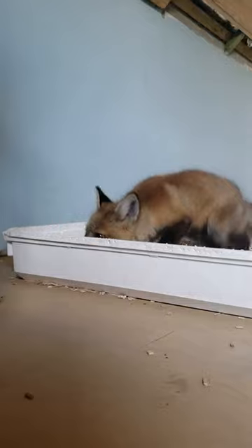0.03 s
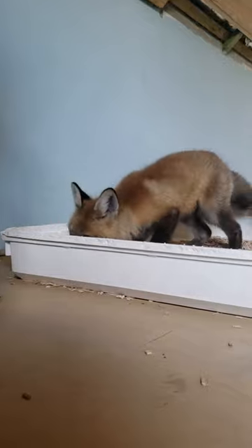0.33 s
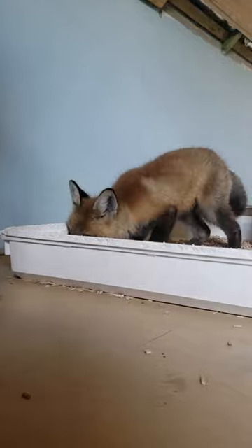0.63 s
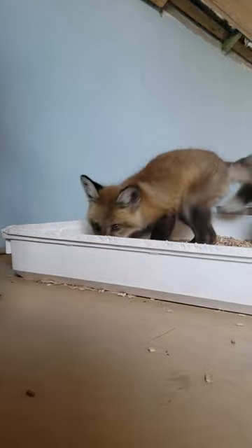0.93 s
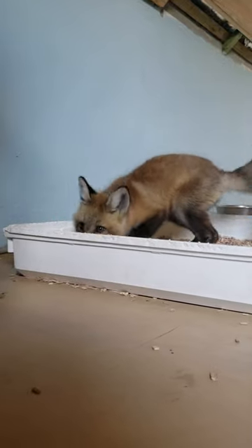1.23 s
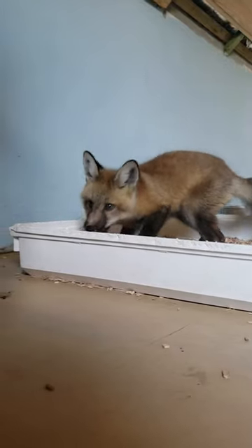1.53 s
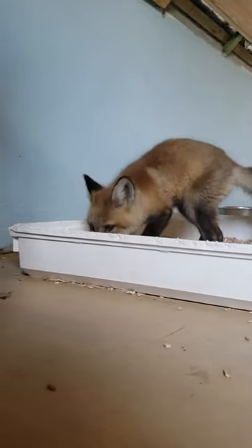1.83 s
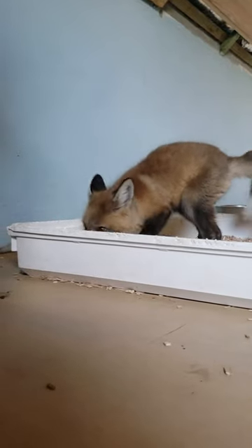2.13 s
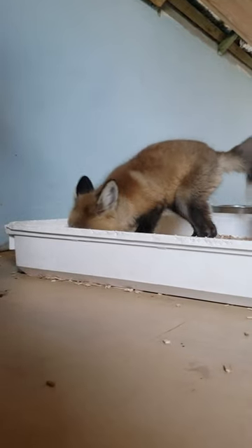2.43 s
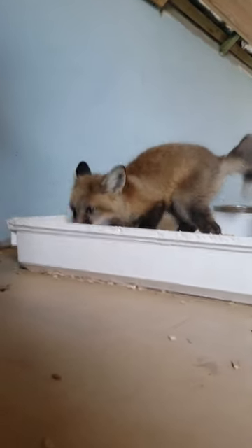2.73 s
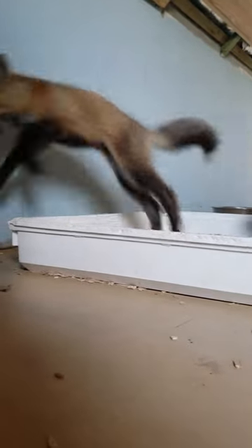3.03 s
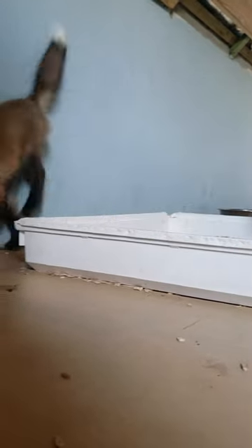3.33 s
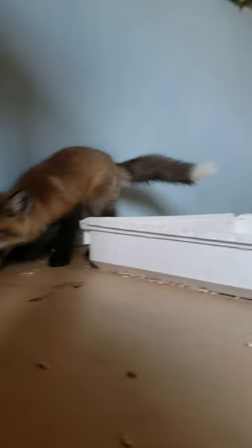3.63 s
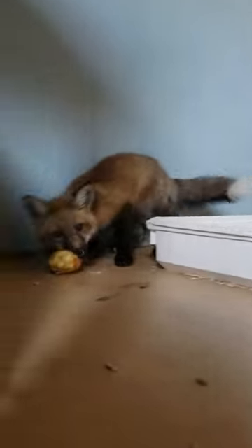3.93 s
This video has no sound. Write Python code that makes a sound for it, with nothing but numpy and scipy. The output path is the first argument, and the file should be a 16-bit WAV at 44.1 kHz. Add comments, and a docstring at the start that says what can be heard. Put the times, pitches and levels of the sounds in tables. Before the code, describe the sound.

Litter crunches and rustles as a fox cub digs in a plastic tray in a small room, with stronger strokes, knocks and clicks around 1, 1.9 and 2.5 seconds. Faint birds twitter outside until about 1.6 seconds. At 2.8 seconds something brushes the microphone on the right. The cub jumps out, scattering litter and thumping onto the floor from 3.2 to 3.5 seconds. An airy swish swells near the end.

```python
"""Over low room tone, small birds twitter outside as a fox cub starts rooting through the litter of a
plastic tray in a small bare room. Each stroke is a cloud of grains that crunch, hiss and rattle the tray;
paws knock and drag, claws and pellets click. Near 2.8 s something brushes the right microphone. Then the
cub leaps out in a spray of fine litter and thumps onto the floor, which rings low. A long, airy swish
swells beside the right microphone at the end."""
import sys
import numpy as np
from scipy import signal
from scipy.fft import rfft, irfft
from scipy.io import wavfile
from scipy.ndimage import uniform_filter1d

SR = 44100
rng = np.random.default_rng(int(sys.argv[2]) if len(sys.argv) > 2 else 0)


def persist_wave(psi):
    """Save psi, clipped to +-1, as 16-bit WAV."""
    counts = np.round(np.clip(psi, -1, 1) * 32767).astype(np.int16)
    wavfile.write(sys.argv[1], SR, np.atleast_2d(counts).T)


N = 176400

# EQ curves of the room tone: rumble and hiss (frequency [Hz], gain [dB])
AIR_RUMBLE_EQ = [(25, -23), (40, -7), (55, 5), (70, -1.5), (90, -14), (130, -8.5), (200, -23.5),
                 (500, -26.5), (1500, -51), (6000, -53)]
AIR_HISS_EQ = [(200, 1), (500, -5.5), (1200, -11), (3000, -8), (5000, -10.5), (8200, -12.5), (13000, -6),
               (16000, -9)]
# bird twitters (time [s], length [s], pitch [Hz], sweep [share of pitch], level [dB])
TWITTERS = [(0.25, 0.054, 2820, 0.0422, -72), (0.38, 0.094, 3780, 0.031, -66.5),
            (0.408, 0.059, 3350, 0.096, -62.5), (0.638, 0.12, 6800, 0.083, -71.5),
            (0.654, .06, 3900, 0.062, -70.5), (0.76, 0.073, 2810, .035, -59.5), (.8, 0.05, 2550, 0.11, -60),
            (1.351, 0.061, 2750, 0.0545, -51.5), (1.448, 0.08, 3500, 0.1264, -54.5),
            (1.44, .2, 2790, .06, -59), (0.471, 0.0406, 3266, 0.1045, -71.5)]
# close brushes (peak time [s], rise [s], fall [s], rumble [dB], scratch [dB], hiss [dB])
BRUSHES = [(2.788, 0.0117, 0.0148, -43, -49, -64), (2.838, 0.0015, .006, -35.5, -39, -31),
           (2.861, .024, .011, -30, -22, -33)]
# EQ curves of the close rubbing (frequency [Hz], gain [dB])
RUMBLE_EQ = [(25, -20), (60, -5), (110, 7), (250, -6.5), (600, -28.5)]
SCRATCH_EQ = [(100, -3), (350, 3.5), (900, 2), (1500, 1.5), (2100, 4), (4000, -9.5), (7000, -13.5),
              (10000, -6.5), (16000, -23)]
SWISH_EQ = [(60, -1.5), (200, -5), (400, -14.5), (750, -8.5), (1300, -21), (2200, -19.5), (3200, -13),
            (5000, -13.5), (7200, -4), (8200, -14), (10000, -1.5), (13500, 3.5), (16000, -1)]
# resonances of the floor and the plastic tray (frequency [Hz], level [dB], time to fall 60 dB [s])
FLOOR_MODES = [(56, -11, 0.24), (80, -3.5, 0.203), (108, -3, 0.2), (120.4, -4, 0.164), (182.8, -4.5, 0.19),
               (283.1, -4, 0.123), (294.9, -2, .22), (343, -7.5, 0.123), (419.5, -6.5, 0.087)]
TRAY_MODES = [(467.6, -0.5, 0.138), (590.6, 0.5, 0.124), (713, -19, 0.115), (786, -6, 0.066),
              (943, 0.5, 0.056), (1164, -15.5, 0.044), (1317, -4, 0.037), (1687, 7.5, 0.13),
              (2000, 3.5, .07), (2220, 2.5, 0.076), (2470, 9, 0.02)]
# paw drags on bare plastic (peak time [s], rise [s], fall [s], level [dB])
DRAGS = [(.05, 0.113, 0.16, -74), (.82, 0.056, 0.16, -63.5), (2.385, 0.048, 0.2, -56),
         (2.47, .02, 0.091, -48.5), (2.54, 0.073, 0.12, -54.5), (2.62, 0.037, 0.12, -64.5)]
# litter flung by the leap (time [s], decay [s], level [dB])
SPRAYS = [(3.172, 0.066, -41.5), (3.232, 0.022, -40), (3.423, 0.034, -43)]
# pellet and claw ticks (time [s], level [dB], pan left minus right [dB])
CLICKS = [(.919, -39, 4), (1.144, -41, -4), (1.241, -39.5, -5), (1.261, -36.5, -0.5), (1.328, -63, 6),
          (1.425, -36, -0.5), (1.586, -53, 4.5), (1.8, -52, -6.5), (1.89, -30.5, 1), (2.459, -40.5, 16),
          (2.806, -36, -1.5), (2.944, -54.5, -11), (3.014, -40, -7), (3.173, -50, -10), (3.22, -35.5, -11),
          (3.282, -39.5, -2), (3.422, -36.5, -2.5), (3.533, -33, -3), (3.846, -47, 5.5)]
# paw hits on the tray (time [s], level [dB])
KNOCKS = [(.955, -49), (.973, -30), (.996, -41), (1.023, -39.5), (1.124, -56), (1.263, -45), (1.457, -44.5),
          (1.89, -38), (1.952, -43), (2.461, -41.5), (2.48, -43.5), (2.857, -35), (2.998, -45), (3.24, -36)]
# paws landing (time [s], level [dB], contact pitch [Hz])
FOOTFALLS = [(0.759, -65, 118), (0.965, -55.5, 149), (1.12, -60, 170), (1.449, -56.5, 176),
             (1.921, -61, 150), (2.781, -52, 149.5), (3.23, -36.5, 108), (3.253, -42, 281),
             (3.277, -39.5, 134), (3.328, -35, 121.4), (3.348, -38, 88.8), (3.417, -38.5, 140),
             (3.432, -42.5, 389.5), (3.449, -39.5, 283.5), (3.5, -52, 100)]
# strokes through the litter
# (peak time [s], rise [s], fall [s], tray [dB], crunch [dB], hiss [dB], hiss pan left minus right [dB])
STROKES = [(.19, 0.126, 0.19, -71, -74, -54, -3), (0.251, 0.186, 0.03, -72, -62, -54.5, 0),
           (0.868, 0.036, 0.27, -54, -44, -44, -3.5), (.93, 0.084, 0.13, -52, -48, -51, 0.5),
           (0.984, 0.063, 0.1268, -42, -38.5, -44.5, -1), (1.019, 0.078, 0.0625, -47.5, -37.5, -39.5, 0),
           (1.16, 0.066, 0.1437, -54.5, -48.5, -51, -2), (1.256, .08, 0.11, -59, -47.5, -55.5, -3),
           (1.442, 0.343, 0.0287, -54.5, -50.5, -59, -1), (1.52, .1, .25, -72, -66, -66, -6),
           (1.85, .1, 0.5144, -62.5, -54.5, -55, -5), (1.91, 0.053, 0.232, -45.5, -41.5, -43, 0.5),
           (1.96, 0.036, 0.2834, -75.5, -44.5, -49.5, 1), (2.2, 0.23, 0.44, -63, -56, -63, -2.5),
           (2.383, 0.0462, 0.1838, -50.5, -58, -59.5, 5), (2.482, 0.042, 0.0537, -45.5, -47, -42.5, 0.5),
           (2.817, .11, 0.2529, -48, -42.5, -48.5, -3), (2.94, 0.036, 0.08, -53.5, -50.5, -53, -5.5),
           (3.025, 0.0547, 0.1449, -49.5, -45, -51, -3), (3.191, 0.0232, 0.05, -65, -49, -49, -14.5),
           (3.241, 0.0936, 0.13, -50, -47.5, -44.5, 0), (3.449, 0.082, 0.1528, -55, -56, -52, -2),
           (3.58, 0.057, 0.16, -64, -50.5, -48.5, -1), (3.655, 0.07, .2, -79.5, -55.5, -50.5, 0),
           (3.715, .05, 0.02, -83, -60, -59.5, -3.5)]
# EQ curves of the cub's layers; the brushes share the hiss curve (frequency [Hz], gain [dB])
DRAG_EQ = [(300, -33.5), (520, -5.5), (620, 1), (790, -2.5), (950, -13.5), (1400, -27)]
SPRAY_EQ = [(6000, -24), (9000, -6), (12200, -10.5), (13000, 5), (16000, -2)]
CLICK_EQ = [(500, 6), (1500, -13), (3000, 9.5), (6000, 3), (8200, -4.5), (10000, 0), (14000, 6),
            (16000, -14)]
KNOCK_EQ = [(150, -32), (500, -4), (1400, 3), (2400, -1), (3200, -5.5), (4200, -12), (7000, -15),
            (15000, -30)]
THUD_EQ = [(30, -26), (60, -6.5), (120, 3), (400, 0.5), (600, -21.5), (2000, -31)]
TRAY_EQ = [(50, -25), (110, -15), (200, -13.5), (320, -3.5), (450, -1), (600, 0), (800, 0.5), (1100, -3),
           (1500, -4.5), (3000, -27.5)]
CRUNCH_EQ = [(400, -22), (1000, -16), (1400, -6.5), (2300, 0.5), (3100, -0.5), (4000, -3.5), (6800, -7.5),
             (8200, -15.5), (15000, -46)]
HISS_EQ = [(2500, -19.5), (5000, -5), (7200, 1.5), (8200, -9.5), (9500, 0), (12000, 0.5), (13500, 2.5),
           (16000, -6.5)]


def amp(db):
    """Decibels to gain."""
    return 10 ** (np.asarray(db) / 20)


def unit(x):
    """Scale to rms 1."""
    return x / np.sqrt(np.mean(x ** 2))


def clock():
    """Time of every sample in seconds."""
    return np.arange(N) / SR


def noise():
    """White noise."""
    return rng.standard_normal(N)


def pan(db):
    """Left and right gains at constant power; positive leans left."""
    return unit(amp([[db / 2], [-db / 2]]))


def convolve(x, response):
    """Play x through a response scaled to unit energy."""
    return signal.fftconvolve(x, response / np.sqrt(np.sum(response ** 2)))[:N]


def eq(x, curve, size=4096):
    """Minimum-phase EQ that keeps the power of white noise."""
    hz, db = np.array(curve, float).T
    bin_hz = np.arange(size // 2 + 1) * SR / size
    gain = amp(np.interp(np.log(bin_hz + 1), np.log(hz), db))
    cepstrum = irfft(np.log(gain))
    cepstrum[1:size // 2] *= 2
    cepstrum[size // 2 + 1:] = 0
    return convolve(x, irfft(np.exp(rfft(cepstrum))))


def ring(modes):
    """Decaying sines of a struck body."""
    t = clock()[:SR // 2]
    return sum(amp(db - 60 * t / t60) * np.sin(2 * np.pi * hz * t) for hz, db, t60 in modes)


def swell(peak, rise, fall):
    """Envelope that climbs to its peak and dies away, 20 dB in each given time."""
    t = clock() - peak
    return amp(-20 * np.minimum(np.maximum(-t / rise, t / fall), 10))


def strike(start, decay_s):
    """Envelope with a hard attack and an exponential decay."""
    t = clock() - start
    return (t >= 0) * np.exp(-np.clip(t / decay_s, 0, 20))


def grains(per_s=2800, spread_db=6):
    """Dense tiny impacts of very uneven size."""
    impacts = (rng.random(N) < per_s / SR) * np.sign(noise())
    return unit(impacts * amp(spread_db * np.clip(noise(), -2, 2)))


def room(x, wet_db, low_t60_s=0.52, treble_t60_s=0.34, predelay_s=0.0026):
    """Bare walls answer differently at each microphone; the treble dies first."""
    t = clock()[:SR]
    out = []
    for side in np.broadcast_to(x, (2, N)):
        wash = rng.standard_normal(SR)
        low = signal.sosfilt(signal.butter(1, 4000, fs=SR, output="sos"), wash)
        tail = low * amp(-60 * t / low_t60_s) + (wash - low) * amp(-60 * t / treble_t60_s)
        out.append(side + amp(wet_db) * convolve(side, tail * (t > predelay_s)))
    return np.array(out) / np.hypot(1, amp(wet_db))


def room_tone():
    """A steady bed: centred rumble under a faint, wide hiss."""
    rumble = eq(noise(), AIR_RUMBLE_EQ)
    hiss = np.array([eq(noise(), AIR_HISS_EQ) for _ in range(2)])
    return amp(-65) * rumble + amp(-70) * hiss


def birds(trill_hz=37.36, trill_depth=0.972, waver_depth=0.5, blur_t60_s=0.33):
    """Twitters of rapid downward sweeps, off to the left and blurred by distance."""
    t, calls = clock(), 0
    for start, length, pitch_hz, sweep, db in TWITTERS:
        progress = np.clip((t - start) / length, 0, 1)
        envelope = np.sqrt(2 * np.abs(np.sin(np.pi * progress)))
        waver = unit(uniform_filter1d(noise(), size=60))
        sawtooth = 1 - 2 * (trill_hz * (t - start) % 1)
        hz = pitch_hz * (1 + sweep * (trill_depth * sawtooth + waver_depth * waver))
        calls += amp(db) * envelope * np.sin(2 * np.pi * np.cumsum(hz) / SR)
    tail = strike(0, blur_t60_s / np.log(1000))
    return np.array([convolve(calls, noise() * tail) for _ in range(2)]) * pan(db=5)


def swish():
    """A smooth, airy rub swells beside the right microphone."""
    rub = np.array([eq(noise(), SWISH_EQ) for _ in range(2)])
    return amp(-37) * rub * swell(peak=3.915, rise=0.49, fall=0.62) * amp([[-21], [0]])


def brushes():
    """Dry rubbing close to the right microphone: rumble, scratch and hiss."""
    rumble = scratch = hiss = 0
    for peak, rise, fall, rumble_db, scratch_db, hiss_db in BRUSHES:
        envelope = swell(peak, rise, fall)
        rumble += envelope * amp(rumble_db)
        scratch += envelope * amp(scratch_db)
        hiss += envelope * amp(hiss_db)
    rub = rumble * eq(noise(), RUMBLE_EQ) + eq(scratch * noise(), SCRATCH_EQ)
    rub += eq(hiss * noise(), HISS_EQ)
    return rub * amp([[-22], [0]])


def paw_drags():
    """A dragging paw sticks and slips on bare plastic and makes the tray hum."""
    envelope = sum(amp(db) * swell(peak, rise, fall) for peak, rise, fall, db in DRAGS)
    return eq(grains() * envelope, DRAG_EQ)


def litter_sprays():
    """Fine litter flies off the leaping paws in a very bright patter on the right."""
    envelope = sum(amp(db) * strike(start, decay) for start, decay, db in SPRAYS)
    return eq(grains() * envelope, SPRAY_EQ) * pan(db=-13.5)


def clicks():
    """Bright ticks of single pellets and claws."""
    envelopes = sum(amp(db) * pan(pan_db) * strike(start, decay_s=0.0039) for start, db, pan_db in CLICKS)
    return np.array([eq(noise() * envelope, CLICK_EQ) for envelope in envelopes])


def tray(x):
    """The hollow plastic body colours what hits it and adds a short ring."""
    return eq(x, TRAY_EQ) + amp(-8) * convolve(x, ring(TRAY_MODES))


def paw_knocks():
    """A paw drives litter against the tray: a hollow knock with a crack on top."""
    burst = noise() * sum(amp(db) * strike(start, decay_s=0.0044) for start, db in KNOCKS)
    return tray(burst) + amp(1) * eq(burst, KNOCK_EQ)


def floor_thumps(contact_cycles=0.456, contact_rise_s=0.0023):
    """Padded feet push on the floor; a harder contact wakes higher modes."""
    floor, out = unit(ring(FLOOR_MODES)), 0
    length = len(floor)
    t = clock()[:length]
    for start, db, hz in FOOTFALLS:
        thud = eq(noise() * strike(0, decay_s=0.0464), THUD_EQ)[:length]
        envelope = np.exp(-t * hz / contact_cycles) * (1 - np.exp(-t / contact_rise_s))
        contact = envelope * np.sin(2 * np.pi * hz * t)
        thump = signal.fftconvolve(floor + amp(-3.5) * unit(thud), contact)[:length]
        thump /= np.std(thump[:SR // 25])  # the first 40 ms set the level
        out += amp(db) * np.interp(clock() - start, t, thump, left=0, right=0)
    return out


def digging(catch_per_s=110, catch_db=2):
    """Strokes catch and slip in the litter; grains rattle the tray, crunch and hiss."""
    catch_times = np.arange(0, 5, 1 / catch_per_s)
    flutter = np.interp(clock(), catch_times, noise()[:len(catch_times)])
    catch = unit(amp(catch_db * flutter))
    tray_power = crunch_power = hiss_power = 0
    for peak, rise, fall, tray_db, crunch_db, hiss_db, pan_db in STROKES:
        envelope = swell(peak, rise, fall)
        tray_power += (envelope * amp(tray_db)) ** 2
        crunch_power += (envelope * amp(crunch_db)) ** 2
        hiss_power += (envelope * amp(hiss_db) * pan(pan_db)) ** 2

    def cloud(power):
        return grains() * catch * np.sqrt(power)

    litter = [eq(cloud(crunch_power), CRUNCH_EQ) + eq(cloud(side), HISS_EQ) for side in hiss_power]
    rattle = [tray(cloud(tray_power)) for _ in range(2)]
    return np.array(litter) + np.array(rattle) * pan(db=-4.5)


def scene():
    """The mix: the cub in the room, birds far off, close dry rubbing, room tone beneath."""
    cub = room(digging() + paw_drags() + litter_sprays(), wet_db=-4.5)
    cub += room(paw_knocks(), wet_db=-1.5)
    cub += room(clicks(), wet_db=-1)
    cub += room(floor_thumps(), wet_db=-12)
    return cub + birds() + brushes() + swish() + room_tone()


def record(dry, low_cut_hz=40, high_cut_hz=15900):
    """Roll off the deepest bass and cut the very top steeply."""
    low_cut = signal.butter(4, low_cut_hz, "high", fs=SR, output="sos")
    high_cut = signal.ellip(10, 0.2, 70, high_cut_hz, fs=SR, output="sos")
    return signal.sosfilt(high_cut, signal.sosfilt(low_cut, dry))


dry = scene()
out = record(dry)
persist_wave(out)
```